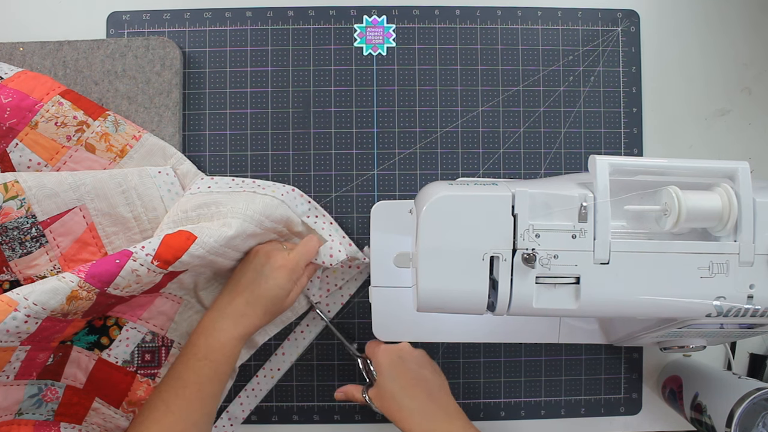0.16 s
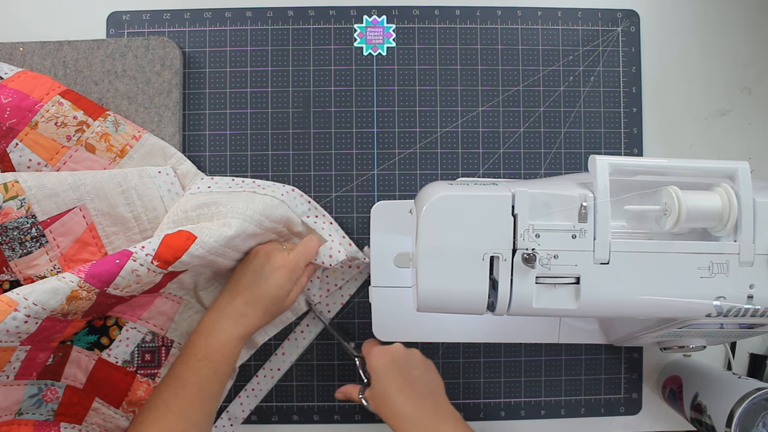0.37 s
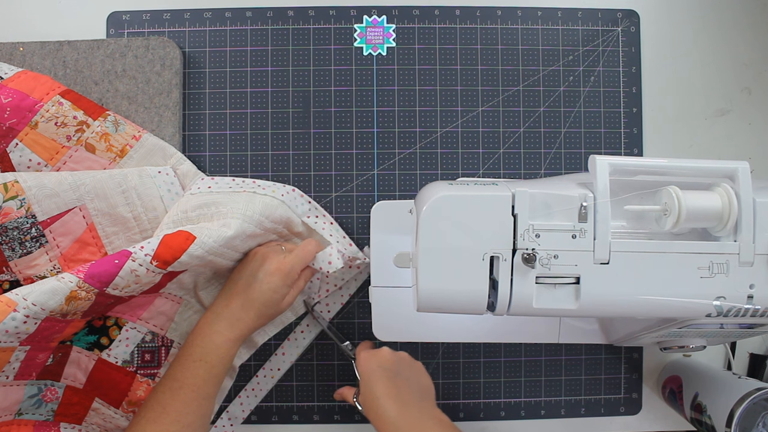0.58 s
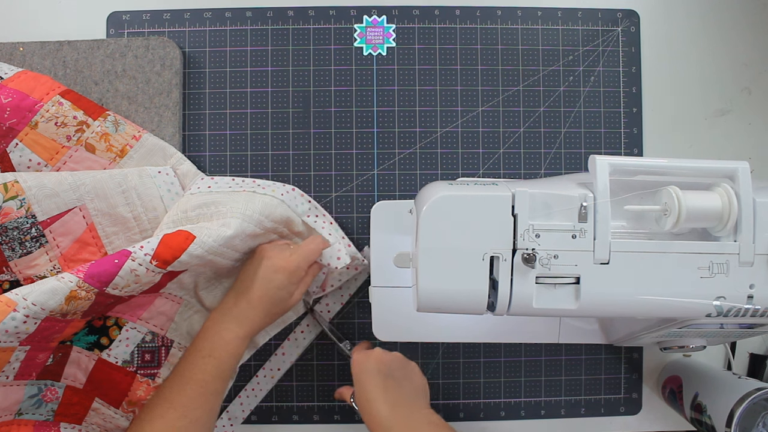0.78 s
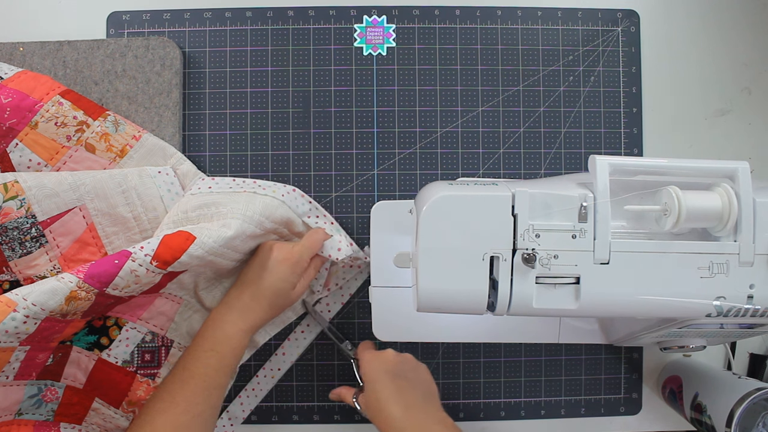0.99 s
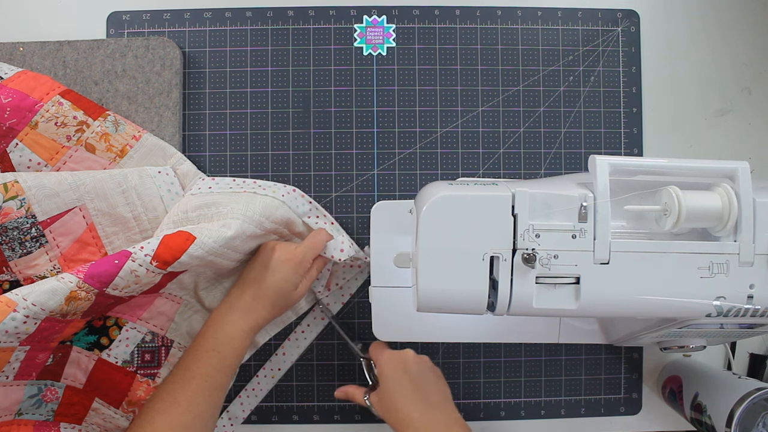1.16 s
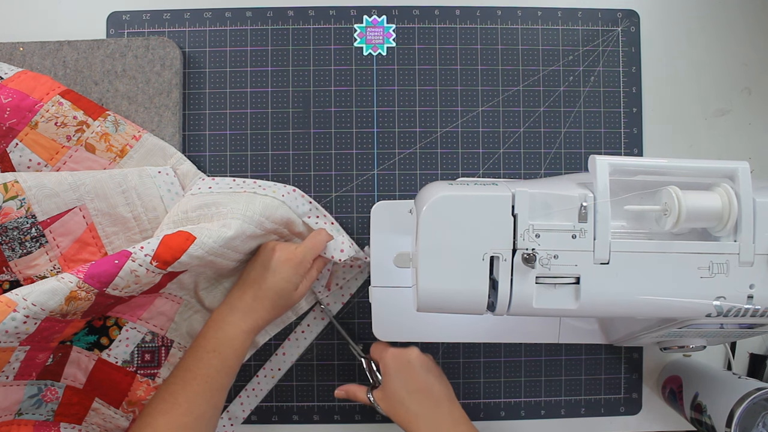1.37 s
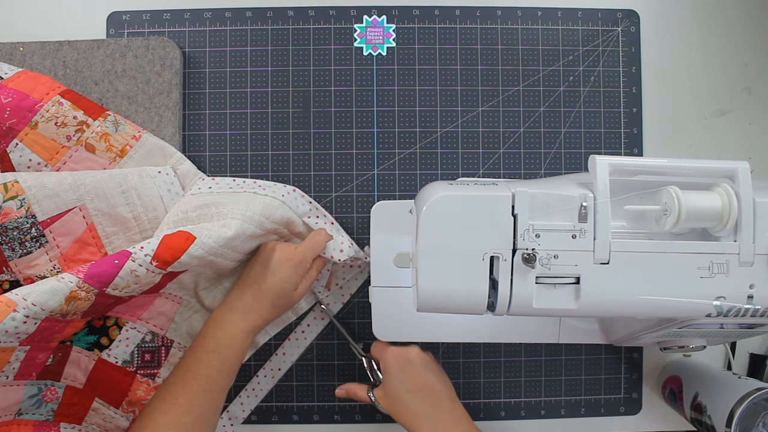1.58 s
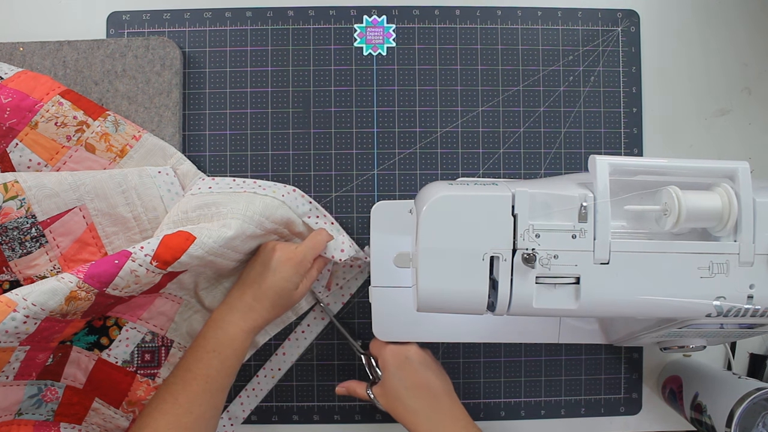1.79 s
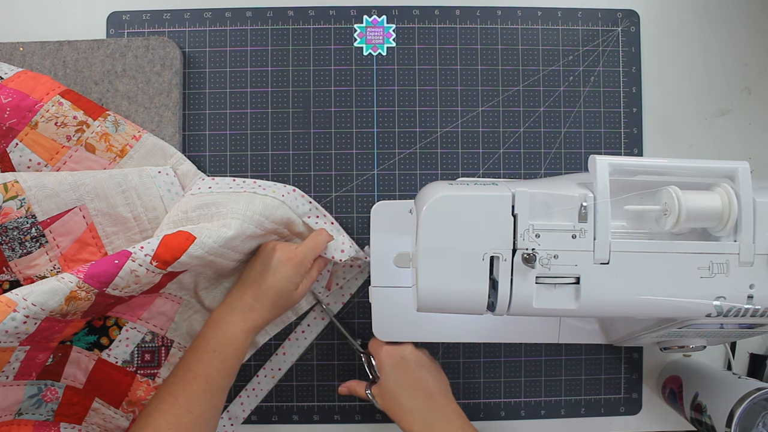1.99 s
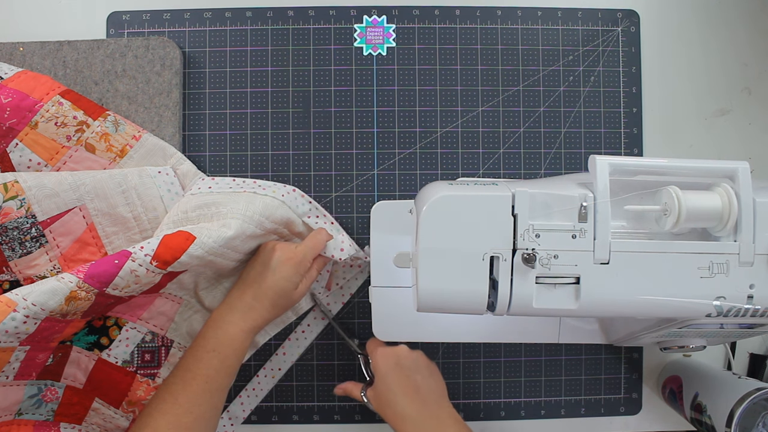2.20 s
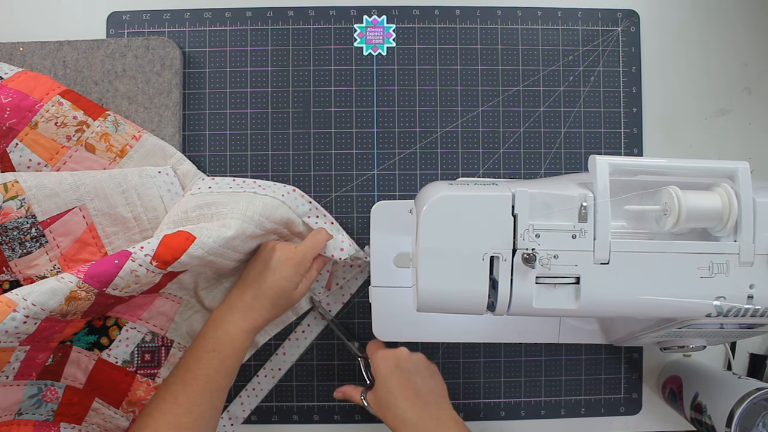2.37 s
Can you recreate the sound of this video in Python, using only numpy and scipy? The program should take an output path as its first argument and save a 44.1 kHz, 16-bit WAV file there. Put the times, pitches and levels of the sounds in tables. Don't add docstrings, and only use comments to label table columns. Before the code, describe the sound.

Close above a sewing table in a quiet indoor room, scissor blades scrape and snap shut loudly, hands knock the table and cloth rustles, then near the end the blades slide and click faintly over constant hiss.

```python
import sys
import numpy as np
from scipy import signal
from scipy.fft import rfft, irfft
from scipy.io import wavfile
from scipy.ndimage import uniform_filter1d, map_coordinates

SR = 44100
rng = np.random.default_rng(int(sys.argv[2]) if len(sys.argv) > 2 else 0)


def elevation(decibels):
    levels = np.asarray(decibels, float)
    return 10 ** (levels / 20)


def dump_mix(stems):
    frames = np.atleast_2d(stems).T
    limited = np.clip(frames, -1, 1)
    pcm = np.round(limited * 32767).astype(np.int16)
    wavfile.write(sys.argv[1], SR, pcm)


N = 110250

# pitch_hz, level_db per Hz
HISS_COLOUR = [(12, -28), (20, -10.5), (53, -10), (88, -2), (239, -4.5), (274, -4.5), (728, -8.5),
               (6220, -12), (15600, -18)]
# pitch_hz, t60_s
ROOM_DECAY = [(200, 0.31), (3000, 0.11), (8000, 0.28), (14000, 0.078)]
# time_s, level_db
QUILT_MOVES = [(0, -82), (.3, -63.5), (.45, -66.5), (.58, -60.5), (.68, -62.5), (.78, -62.5), (.9, -66),
               (.97, -64.5), (1.1, -72), (1.4, -88), (1.75, -73.5), (1.83, -65), (2.0, -72.5), (2.2, -81.5),
               (2.5, -80)]
# pitch_hz, level_db
RUSTLE_COLOUR = [(60, -33), (120, 5), (300, 1.5), (1000, -1), (2500, -5.5), (5000, -6.5), (8000, -14.5),
                 (15000, -7)]
# start_s, boom_db, body_db, knock_db
TABLE_BUMPS = [(0.188, -68, -57.5, -77), (.2385, -47.5, -41.5, -47), (.251, -46.5, -56, -58),
               (0.442, -40, -42.5, -65), (.587, -67, -54.5, -57.5), (.645, -62, -55, -50),
               (.696, -59, -46.5, -53), (.704, -56.5, -39.5, -44.5), (.722, -52, -67.5, -49.5),
               (.752, -52, -50, -54), (1.006, -62, -59, -61.5), (1.914, -59, -58, -74)]
# pitch_hz, level_db, t60_s
TABLE_BOOM = [(119.2, 0, 0.24)]
# pitch_hz, level_db, t60_s
TABLE_BODY = [(201.2, 0, 0.11), (236, -3.1, 0.15)]
# pitch_hz, level_db, t60_s
TABLE_KNOCK = [(410.4, -7.5, 0.12), (528, 6.5, 0.052), (807, 1.5, 0.048), (1195, -5, 0.051),
               (1453, -9, 0.051)]
# start_s, level_db, t60_s
DRY_TICKS = [(0.1865, -54, 0.0133), (0.2364, -32.5, 0.014), (.587, -51, 0.025), (.646, -54, 0.032),
             (0.708, -43.5, 0.016), (0.715, -47, .02), (1.0043, -47.5, 0.022), (2.067, -59, 0.053)]
# pitch_hz, level_db per Hz
TICK_COLOUR = [(200, -4.5), (500, -1.5), (1200, -3.5), (3000, -6), (5000, -6.5), (9000, -16),
               (15600, -12.5)]
# end_s, rise_s, squeal_hz,
# squeal_db, rasp_db
BLADE_SLIDES = [(.188, .003, 11800, -59.5, -54), (0.201, .005, 12100, -51.5, -63),
                (0.24, 0.0037, 12140, -35.5, -38), (.235, 0.01, 11900, -52, -72),
                (.24, .004, 15700, -40, -70), (.709, .003, 4560, -54, -70),
                (1.885, 0.083, 1010, -69, -82.5), (.9, .04, 4750, -63, -76), (.945, 0.092, 5320, -69, -80),
                (.201, .004, 7540, -62, -80), (.202, .005, 4200, -60, -80),
                (1.0065, 0.00308, 11720, -55, -60), (1.893, 0.0068, 11840, -59, -59.5),
                (1.9032, 0.0114, 12140, -45, -48.5), (2.08, 0.0153, 4910, -66, -60),
                (2.251, 0.011, 11700, -58.5, -64)]
# pitch_hz, level_db per Hz
RASP_COLOUR = [(800, -24), (2800, -16), (4000, -4), (5600, -14), (7800, -4), (9500, -5), (12000, -7),
               (15000, -11)]
# start_s, pitch_hz, level_db, t60_s
LONE_RINGS = [(.2385, 1120, -43, .025), (.2505, 4545, -39, .13), (1.899, 9980, -48, .075),
              (1.897, 7030, -50, .03), (1.898, 8100, -51, .025), (1.9, 3950, -58, .05),
              (1.9722, 4110, -46, .06)]
# start_s, ring_db, burst_db, burst_hz, crack_db
BLADE_CLACKS = [
    (.25, -32, -8, 13150, -17.5),
    (1.9723, -53, -29.5, 12900, -35),
]
# pitch_hz, level_db, t60_s
SHUT_MODES = [(2644, -1, 0.027), (3480, -4, 0.025), (4200, -2.5, 0.027), (5500, -6.5, 0.036),
              (6300, -9, 0.077), (7240, -9, .04), (7700, -16, 0.059), (11500, -2, 0.045), (12570, -10, .09),
              (13500, -7.5, .07), (13530, -5, 0.113), (13790, -9, .07), (15300, -5, .06)]
# pitch_hz, level_db, t60_s
AJAR_MODES = [(2327, 0, 0.03), (2700, 2, .03), (4580, -1, 0.034), (5500, 2, .025), (8880, -5, 0.041),
              (11050, 0, .03), (12770, 4, 0.048), (12950, 1, .035), (14140, -4.5, .025)]
# pitch_hz, width_hz, level_db
CRACK_BANDS = [(2430, 630, -19.5), (4200, 800, -25), (5690, 130, -20.5), (6550, 570, -10),
               (9800, 3400, -10.5), (13440, 890, 1.5), (14500, 230, -21)]
# pitch_hz, level_db per Hz
SHIMMER_COLOUR = [(880, -30.5), (1500, -15.5), (2720, -26), (3880, -15), (4500, -2.5), (4920, -11),
                  (8160, -24.5), (13500, 3), (16000, -27)]

FLOOR_TOP_HZ = 15850


def unit(x):
    return x / np.sqrt(np.mean(x ** 2) + 1e-20)


def along(points, hz):
    pitch_hz, value = np.transpose(points)
    return np.interp(np.log(hz + 1), np.log(pitch_hz + 1), value)


def noise(response, size):
    spectrum = rfft(rng.standard_normal(size))
    return unit(irfft(spectrum * response(np.fft.rfftfreq(size, 1 / SR)), size))


def coloured(points, size):
    return noise(lambda f: elevation(along(points, f)) * (f < FLOOR_TOP_HZ), size)


def wobble(rate_hz, size):
    knots = rng.standard_normal(int(size * rate_hz / SR) + 4)
    return map_coordinates(knots, [np.arange(size) * rate_hz / SR])


def ring(modes, rise_s, spread, flutter_db=0):
    t = np.arange(SR // 3) / SR
    total = np.zeros(len(t))
    for hz, db, t60_s in modes:
        level_db = db - 60 * t / t60_s + flutter_db * wobble(200, len(t))
        total += elevation(level_db) * np.sin(2 * np.pi * hz * t + spread * rng.normal())
    return (1 - np.exp(-t / rise_s)) * total


def add(track, start_s, x):
    track[round(start_s * SR):][:len(x)] += x


def hiss():
    return elevation(-61.5 + 0.53 * wobble(2.5, N)) * coloured(HISS_COLOUR, N)


def stray(steel):
    floor = elevation(-102 + 7.15 * wobble(18, N))
    with_hits = elevation(-60) * uniform_filter1d(np.abs(steel), size=400)
    return (floor + with_hits) * noise(lambda f: (f > 4320) & (f < 11250), N)


def room(x):
    wall_s = 0.0046
    hz, t, z = signal.stft(rng.standard_normal(SR // 3), SR, nperseg=256)
    fade = elevation(-60 * t / along(ROOM_DECAY, hz)[:, None])
    tail = signal.istft(z * fade, SR, nperseg=256)[1]
    delayed = np.pad(x, (round(wall_s * SR), 0))
    return signal.fftconvolve(delayed, tail / np.linalg.norm(tail))[:N]


def quilt():
    time_s, db = np.transpose(QUILT_MOVES)
    level_db = np.interp(np.arange(N) / SR, time_s, db)
    level_db = level_db + wobble(30, N) + 2 * wobble(200, N)
    return elevation(level_db) * coloured(RUSTLE_COLOUR, N)


def table():
    out = np.zeros(N + SR)
    for start_s, *levels in TABLE_BUMPS:
        for db, modes in zip(levels, (TABLE_BOOM, TABLE_BODY, TABLE_KNOCK)):
            add(out, start_s, elevation(db) * ring(modes, rise_s=0.0029, spread=0.3))
    low_cut = signal.butter(2, 83.6, "highpass", fs=SR, output="sos")
    return signal.sosfilt(low_cut, out)[:N]


def ticks():
    out, t = np.zeros(N + SR), np.arange(4096) / SR
    for start_s, db, t60_s in DRY_TICKS:
        shape = elevation(db - 60 * t / t60_s) * (1 - np.exp(-t / 0.00046))
        add(out, start_s, shape * coloured(TICK_COLOUR, len(t)))
    return out


def shears():
    grit_db, stop_db, stop_t60_s, squeal_width_hz = 2.2, -7, 0.035, 330
    out, size = np.zeros(N + SR), 8192
    t = np.arange(size) / SR - size / 2 / SR
    for end_s, rise_s, hz, squeal_db, rasp_db in BLADE_SLIDES:
        swell = np.exp(-(t / rise_s) ** 2)
        shape = np.where(t < 0, swell, elevation(stop_db - 60 * np.abs(t) / stop_t60_s))
        squeal = noise(lambda f: 1 / (1 + ((f - hz) / squeal_width_hz) ** 2) * (f < FLOOR_TOP_HZ), size)
        rasp = coloured(RASP_COLOUR, size)
        grit = elevation(grit_db * wobble(1200, size))
        add(out, end_s + t[0], shape * grit * (elevation(squeal_db) * squeal + elevation(rasp_db) * rasp))
    return out


def lone_rings():
    out = np.zeros(N + SR)
    for start_s, hz, db, t60_s in LONE_RINGS:
        add(out, start_s, ring([(hz, db, t60_s)], rise_s=0.0015, spread=0, flutter_db=1.5))
    return out


def clacks():
    burst_rise_s, burst_t60_s, beat_hz = 0.001, 0.012, 580
    crack_t60_s, shimmer_t60_s, shimmer_over_ring_db = 0.012, 0.095, 0.5
    out, t = np.zeros(N + SR), np.arange(8192) / SR
    for (start_s, ring_db, burst_db, hz, crack_db), modes in zip(BLADE_CLACKS, (SHUT_MODES, AJAR_MODES)):
        blades = ring(modes, rise_s=0.0002, spread=1.82, flutter_db=2.2)
        add(out, start_s, elevation(ring_db + 4) * blades)

        burst = ring([(hz, 0, burst_t60_s)], burst_rise_s, spread=0)
        burst -= ring([(hz + beat_hz, -8, burst_t60_s)], burst_rise_s, spread=0)
        add(out, start_s, elevation(burst_db) * burst)

        crack = noise(lambda f: sum(elevation(db) / (1 + ((f - c) / w) ** 2) for c, w, db in CRACK_BANDS), len(t))
        crack *= elevation(crack_db - 60 * t / crack_t60_s)
        shimmer = noise(lambda f: elevation(along(SHIMMER_COLOUR, f)), len(t))
        shimmer *= elevation(ring_db + shimmer_over_ring_db - 60 * t / shimmer_t60_s)
        add(out, start_s, (1 - np.exp(-t / 0.00029)) * (crack + shimmer))
    return out


def scene():
    echo_s, echo_db, room_db = 0.008, -20, -13.5
    steel = (shears() + lone_rings() + clacks() + ticks())[:N]
    steel = steel + elevation(echo_db) * np.roll(steel, round(echo_s * SR))
    centre = steel + elevation(room_db) * room(steel) + table() + quilt() + hiss()
    side = stray(steel)
    return centre + np.array([side, -side])


def roll_off(x):
    return signal.sosfilt(signal.butter(12, 16950, fs=SR, output="sos"), x)


def record(dry):
    top_hz = 16400
    kept = irfft(rfft(dry) * (np.fft.rfftfreq(N, 1 / SR) < top_hz), N)
    return roll_off(kept)


dry = scene()
out = record(dry)
dump_mix(out)
```